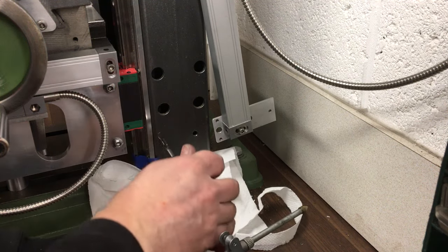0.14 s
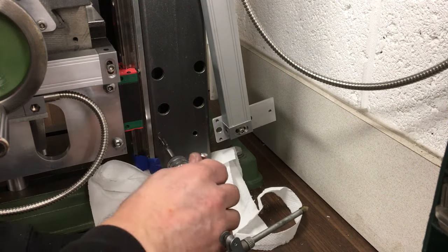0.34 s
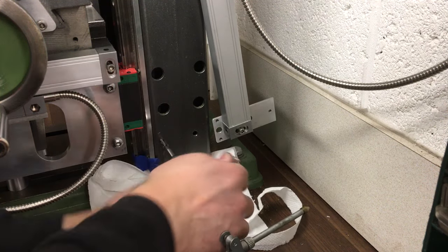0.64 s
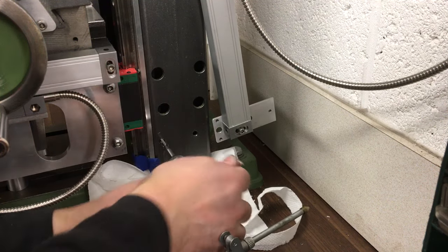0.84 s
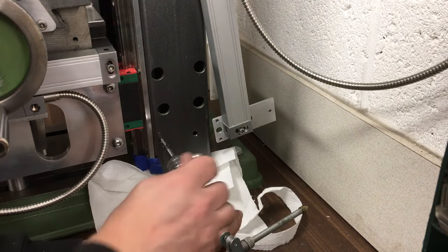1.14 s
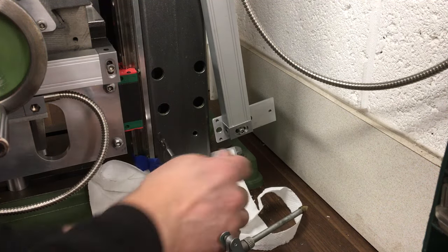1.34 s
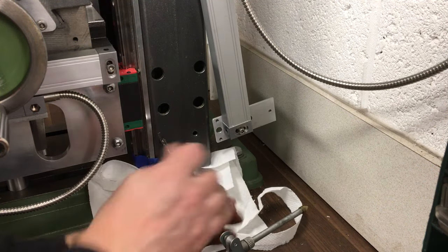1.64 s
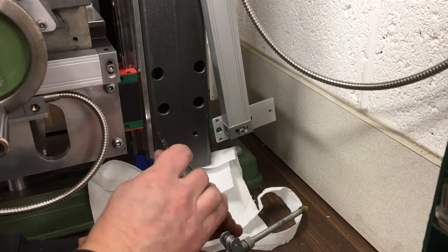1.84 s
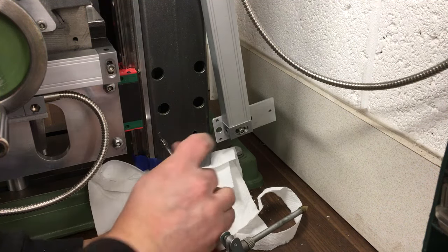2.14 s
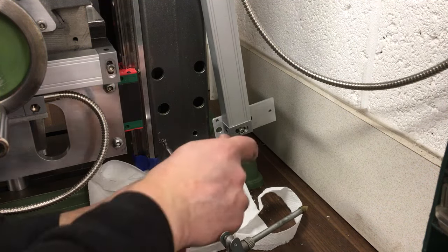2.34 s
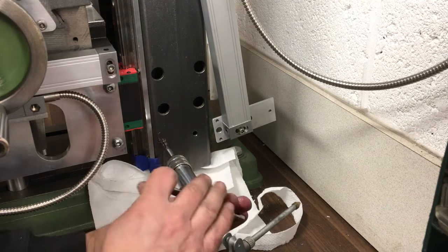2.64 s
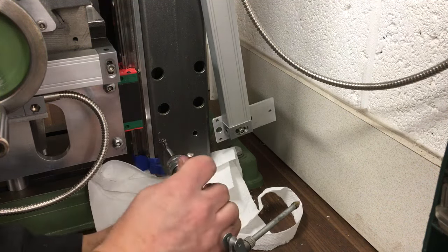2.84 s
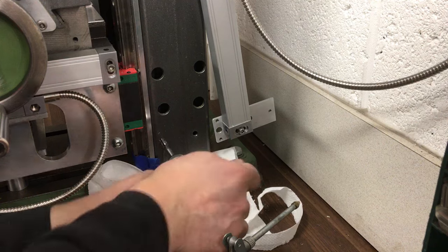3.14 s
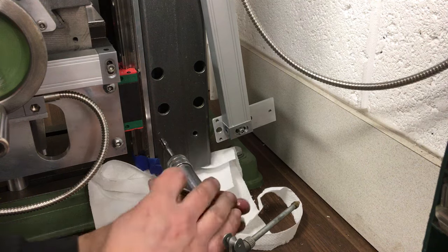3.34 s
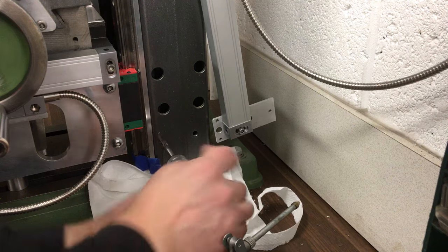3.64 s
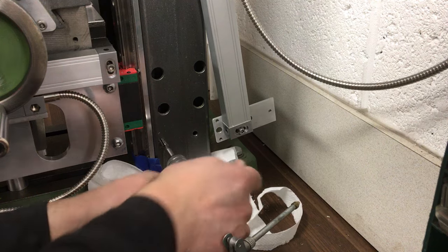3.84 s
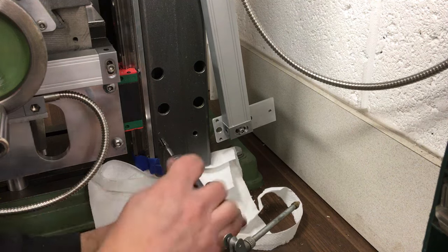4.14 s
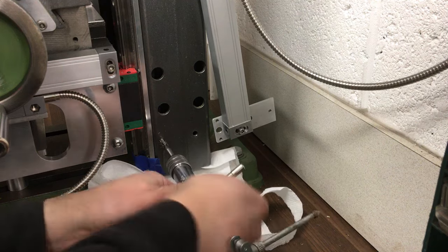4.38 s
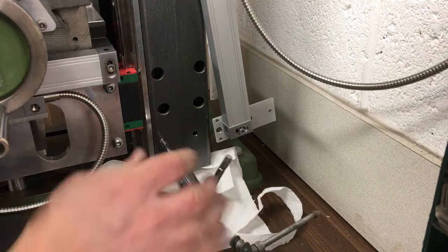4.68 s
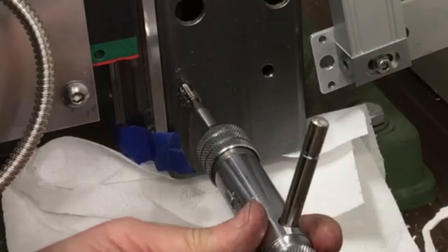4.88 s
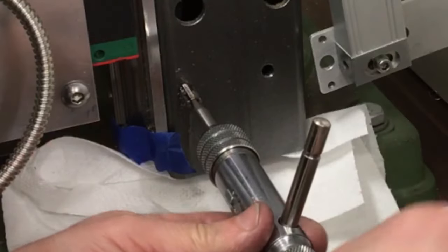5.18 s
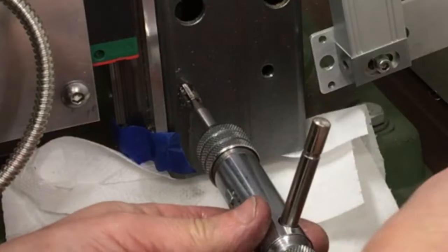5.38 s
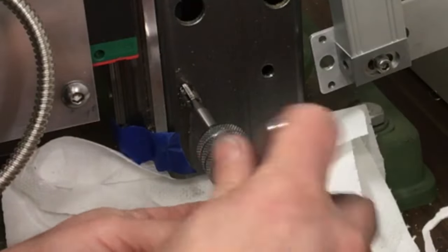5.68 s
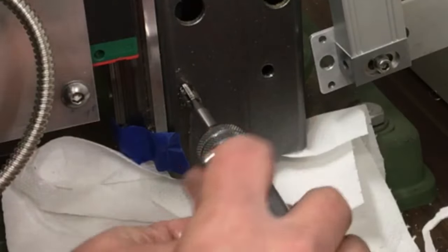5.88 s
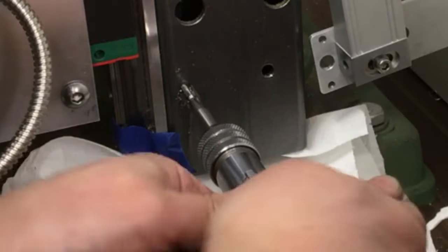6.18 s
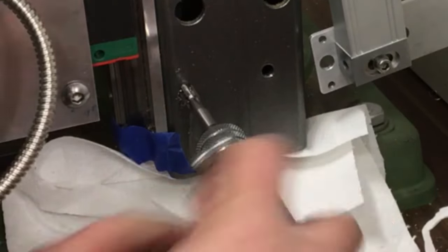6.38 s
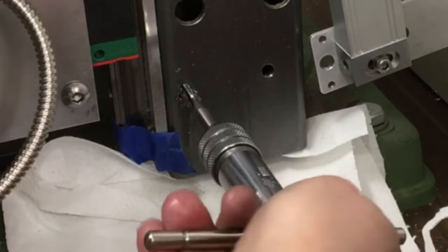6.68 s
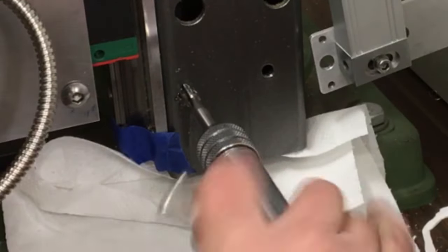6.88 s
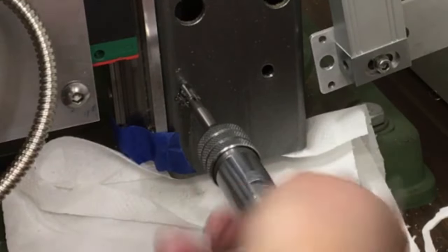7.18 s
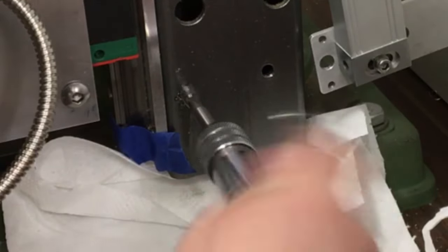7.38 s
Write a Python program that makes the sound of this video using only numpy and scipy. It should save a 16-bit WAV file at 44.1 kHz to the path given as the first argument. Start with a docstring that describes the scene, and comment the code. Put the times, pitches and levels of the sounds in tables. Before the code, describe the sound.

A ratcheting tap wrench clicks in short bright runs as hands rub and knock its steel handle, with dull frame bumps over faint workshop rumble.

```python
"""Low room rumble and faint air are heard first and run throughout; over them a hand bumps and scuffs
a machine's frame, which booms. Close by, a ratcheting tap wrench is worked by hand, all interleaved: fingers
rub and knock the handle, steel contacts tick, and the pawl ticks over a tooth and snaps into the next.
Blows are decaying sine modes plus bursts of coloured noise; rubbing is a stream of tiny random slips that
keeps such sounds going. A short room tail follows."""
import sys
import numpy as np
from scipy import signal
from scipy.fft import rfft, irfft, next_fast_len
from scipy.io import wavfile
from scipy.ndimage import map_coordinates

SR = 44100
rng = np.random.default_rng(int(sys.argv[2]) if len(sys.argv) > 2 else 0)


def dump(signal):
    """Clip the signal to [-1, 1] and save it as 16-bit WAV at the path in sys.argv[1]."""
    limited = np.clip(np.atleast_2d(signal).T, -1, 1)
    pcm = np.round(limited * 32767).astype(np.int16)
    wavfile.write(sys.argv[1], SR, pcm)


N = 331632  # length of the scene in samples


def amp(db):
    """Turn decibels into gain."""
    return 10 ** (np.asarray(db) / 20)


def unit(x):
    """Scale a sound to an rms level of 1."""
    return x / np.sqrt(np.mean(x ** 2) + 1e-20)


def along(points, hz):
    """Read a curve of (Hz, value) points on a log frequency axis."""
    point_hz, value = np.transpose(points)
    return np.interp(np.log(hz + 1), np.log(point_hz + 1), value)


def curves(rows):
    """Draw straight lines between the rows: one value per sample for each column after the time."""
    s, *columns = np.transpose(rows)
    return [np.interp(np.arange(N) / SR, s, column) for column in columns]


def wobble(rate):
    """A smooth random curve with `rate` random points a second."""
    knots = rng.standard_normal(int(N * rate / SR) + 4)
    return map_coordinates(knots, [np.arange(N) * rate / SR])


def filtered(x, gain):
    """Multiply the spectrum of x by a gain that depends on frequency."""
    size = next_fast_len(len(x) + 2048)
    spectrum = rfft(x, size) * gain(np.fft.rfftfreq(size, 1 / SR))
    return irfft(spectrum, size)[:len(x)]


def noise(spectrum, size):
    """Random hiss coloured by a spectrum, with an rms level of 1."""
    return unit(filtered(rng.standard_normal(size), lambda hz: amp(along(spectrum, hz))))


def add(track, s, sound):
    """Mix a sound into the track at time s in seconds."""
    part = track[round(s * SR):][:len(sound)]
    part += sound[:len(part)]


def burst(spectrum, t60, attack):
    """The dense vibration of a contact: coloured noise that falls 60 dB in t60 seconds."""
    t = np.arange(SR // 3) / SR
    onset = 1 - np.exp(-t / attack)
    return noise(spectrum, len(t)) * amp(-60 * t / t60) * onset


def ring(modes, colour, attack, swell_cycles, scatter_db, detune):
    """Decaying sine modes; the blow's colour sets their levels, low ones swell slower, and each blow varies."""
    t = np.arange(SR // 3) / SR
    hz, db, t60 = np.transpose(modes)[:, :, None]
    size, pitch, phase = rng.standard_normal((3, len(modes), 1))
    level = amp(db + along(colour, hz) + scatter_db * size - 60 * t / t60)
    waves = np.sin(2 * np.pi * (hz * (1 + detune * pitch) * t + phase))
    onset = 1 - np.exp(-t / (attack + swell_cycles / hz))
    return np.sum(level * waves * onset, axis=0)


def slips(rate, spread_db):
    """Sparse random impulses of uneven size and either sign, on average `rate` a second."""
    happens = rng.random(N) < rate / SR
    return happens * rng.choice([-1, 1], N) * amp(spread_db * rng.standard_normal(N))


def strokes(rows, swell_db, fade_s):
    """Gain per sample: each stroke swells by swell_db to its crest, eases off again and lets go."""
    t, gain = np.arange(N) / SR, np.zeros(N)
    for crest, rise_s, fall_s, db in rows:
        start, end = crest - rise_s, crest + fall_s
        contact = np.clip(np.minimum(t - start, end - t) / fade_s + .5, 0, 1)
        below_crest_db = np.interp(t, [start, crest, end], [swell_db, 0, swell_db])
        gain = np.maximum(gain, contact * amp(db - below_crest_db))
    return gain


# Low rumble of the room and the moving arm. Each row: time in seconds, relative level in dB.
RUMBLE_LEVEL = [(0.0, -53), (0.23, -62.5), (1.23, -57.5), (1.53, -66), (4.55, -57), (4.79, -69.5),
                (7.46, -50.5), (7.52, -45)]
# Colour of the low rumble. Each row: frequency in Hz, strength in dB per Hz.
RUMBLE_COLOUR = [(12, -44), (20, -30.5), (39, -10), (54, 9), (81, -3.5), (108, 6.5), (124, 7), (146, -7.5),
                 (195, -27.5), (220, -7.5), (290, -30.5), (480, -120)]
# Colour of the still air. Each row: frequency in Hz, strength in dB per Hz.
AIR_COLOUR = [(60, -4.5), (110, -1.5), (180, -18), (260, -8), (500, -14.5), (800, -13.5), (1400, -20),
              (2300, -19), (3100, -26), (6000, -27), (10000, -28), (13000, -32.5), (16500, -41.5)]


def background():
    """Workshop air and low rumble: two coloured noises, the air wavering and the rumble following its level."""
    air = amp(-62.5 + wobble(1.5)) * noise(AIR_COLOUR, N)
    rumble_db = curves(RUMBLE_LEVEL)[0] + 3.0
    return air + amp(rumble_db) * noise(RUMBLE_COLOUR, N)


# Ringing modes of the machine frame. Each row: pitch in Hz, relative level in dB, time to fall 60 dB in seconds.
FRAME_MODES = [(112, -5, .15), (140, -5, .14), (172, 0, .19), (190, -5, .14), (245, -7, .1), (291, -7, .15),
               (345, -8, .07), (404, 1, .14), (473, -2, .12), (545, -11, .07), (684, -16, .07),
               (960, -4, .07), (1080, -9, .06), (1620, -14, .06)]


def boom():
    """A soft push mostly reaches the frame's lowest modes."""
    soft = [(110, -13), (172, -5.5), (250, -14), (450, -30), (900, -51.5)]
    return ring(FRAME_MODES, soft, attack=0.0059, swell_cycles=.7, scatter_db=-1.5, detune=0.013)


# The hand bumps the frame and settles against it. Each row: time in seconds, relative boom level in dB,
# hardness in dB, gap between rebounds in seconds, loss per rebound in dB.
FRAME_BUMPS = [(0.642, -33.5, -27.5, .05, 5), (0.824, -18, -13, 0.052, 8), (1.229, -16, -21.5, .032, 6.5),
               (1.345, -36, -6, 0.031, 8), (2.785, -19.5, -11.5, .02, 18), (2.818, -20.5, -14.5, 0.069, 8),
               (3.556, -17.5, -23, .05, 4), (3.604, -18.5, -11, 0.049, 4), (4.292, -17.5, -12, 0.046, 3.5),
               (4.502, -16.5, -15, .024, 0.5), (4.526, -15, -18.5, 0.047, 8.5),
               (5.066, -18.5, -20.5, 0.062, 10), (5.482, -12.5, -2, 0.0189, 10),
               (5.657, -23, -18.5, 0.047, 0.5), (5.704, -22, -10.5, 0.047, 1.5),
               (6.136, -33.5, -8.5, .03, 6), (6.697, -32.5, -1, 0.026, 9), (7.243, -31.5, -7.5, 0.026, 8)]
# The hand scuffs along the frame. Each row: time of the crest in seconds, rise in seconds, fall in seconds,
# relative level in dB.
FRAME_SCUFFS = [(2.81, 0.037, 0.022, -34), (4.515, 0.015, .04, -30), (5.153, .04, 0.032, -30),
                (5.218, 0.038, 0.023, -32.5), (5.51, .008, .11, -26.5)]
# Colour of the thud of a bump. Each row: frequency in Hz, strength in dB per Hz.
THUD_COLOUR = [(50, -29.5), (110, 4.5), (230, 4), (320, 7), (440, 2.5), (620, 3), (800, -9), (1050, -3.5),
               (1500, -15), (2600, -20.5), (6000, -34), (12000, -41.5)]
CLACK_TILT = 1.7  # hardness counts this much more for the modes near 1 kHz
LEAN_DB = -65.5  # middle level of the frame's faint hum under the working hand, before the high-pass


def frame():
    """Bumps make the frame boom, twice more as the hand settles; harder ones and scuffs reach higher modes."""
    out = np.zeros(N)
    for s, boom_db, hard_db, gap_s, loss_db in FRAME_BUMPS:
        clunk_db = boom_db + hard_db
        clack_db = boom_db + CLACK_TILT * hard_db
        colour = [(110, boom_db - 10), (180, boom_db - 8), (290, clunk_db - 1.5), (400, clunk_db - 8.5),
                  (480, clunk_db - 1.0), (680, clunk_db - 10), (900, clack_db - 0.5)]
        add(out, s, ring(FRAME_MODES, colour, attack=.002, swell_cycles=.7, scatter_db=1.2, detune=.008))
        add(out, s, amp(clunk_db - 6) * burst(THUD_COLOUR, t60=0.13, attack=0.0065))
        add(out, s, amp(clack_db + 6) * burst(THUD_COLOUR, t60=0.043, attack=0.0036))  # the blow itself
        for rebound in (1, 2):
            add(out, s + rebound * gap_s, amp(boom_db - rebound * loss_db) * boom())
    # stick-slip under the hand keeps shaking the same modes
    colour = [(170, 9.8), (290, 10.4), (400, 1.2), (480, 3), (1000, 4)]
    body = ring(FRAME_MODES, colour, attack=.0003, swell_cycles=.2, scatter_db=1, detune=.004)
    contact = body + amp(9) * burst(THUD_COLOUR, t60=0.025, attack=0.000096)
    judder = unit(signal.fftconvolve(slips(rate=1500, spread_db=5), contact)[:N])
    speck = burst(CLATTER_COLOUR, t60=0.01, attack=0.00016)
    grit = unit(signal.fftconvolve(slips(rate=400, spread_db=4), speck)[:N])
    scuff_gain = strokes(FRAME_SCUFFS, swell_db=10.5, fade_s=0.023) * amp(1.8 * wobble(70))
    out += scuff_gain * (amp(0.5) * judder + amp(-21.5) * grit)
    hum = unit(signal.fftconvolve(slips(rate=150, spread_db=5), boom())[:N])
    out += amp(LEAN_DB + 0.5 * wobble(1.7)) * hum
    lowest_hz = 90  # the frame hardly radiates below this
    return signal.sosfilt(signal.butter(3, lowest_hz, "high", fs=SR, output="sos"), out)


# Ringing modes of the handle and tap. Each row: pitch in Hz, relative level in dB,
# time to fall 60 dB in seconds.
HANDLE_MODES = [(860, -2, 0.06), (1101, -2.5, 0.032), (1637, -1, 0.032), (1990, -17, 0.11),
                (2270, -11, 0.058), (2439, 0.5, 0.03), (2550, -17.5, 0.13), (3013, -14, 0.085),
                (3300, -8.5, 0.057), (3487, -6.5, 0.015), (3933, -13.5, 0.058), (4514, -1.5, 0.015),
                (5240, -12.5, 0.049)]
# Colour of the cloud of weaker modes. Each row: frequency in Hz, strength in dB per Hz.
CLATTER_COLOUR = [(300, -7), (600, -1.5), (900, 3.5), (1350, 0), (2300, -0.5), (2800, -3), (3300, -15),
                  (4100, -5.5), (5500, -13.5), (8000, -22)]


def handle(low_db, high_db, attack):
    """The wrench body answers a contact: clear modes in a cloud of weaker ones."""
    modes = ring(HANDLE_MODES, [(1500, low_db), (2600, high_db)], attack=attack, swell_cycles=4.2,
                 scatter_db=3.7, detune=0.015)
    cloud_db = (low_db + high_db) / 2 - 5.0
    return modes + amp(cloud_db) * burst(CLATTER_COLOUR, t60=0.061, attack=attack)


# Skin and sleeve slide over the tool. Each row: time of the crest in seconds, rise in seconds,
# fall in seconds, relative level in dB.
RUB_STROKES = [(.75, 0.076, .2, -67), (1.52, 0.037, 0.058, -63), (2.33, 0.016, .12, -57.5),
               (2.8, 0.033, 0.034, -55), (3.2, .11, 0.062, -58), (3.85, 0.091, 0.091, -56.5),
               (4.445, 0.054, 0.067, -48.5), (6.21, 0.19, 0.12, -52), (6.46, 0.11, 0.18, -53.5),
               (6.78, 0.081, 0.072, -50.5), (7.19, 0.16, 0.14, -51), (7.5, 0.13, 0.063, -50)]
# Colour of the skin's rub. Each row: frequency in Hz, strength in dB per Hz.
SKIN_COLOUR = [(100, -26), (300, -3.5), (600, -7.5), (860, -8), (1700, -9), (2400, -17), (3000, -13.5),
               (4500, -38.5), (8000, -58)]
# Colour of the sleeve's hiss. Each row: frequency in Hz, strength in dB per Hz.
SLEEVE_COLOUR = [(2000, -15), (4500, 2), (7000, -8), (9000, 2), (12000, -15), (16000, -23)]
# Colour of the grains of the knurling. Each row: frequency in Hz, strength in dB per Hz.
KNURL_COLOUR = [(1200, -18), (2500, 3.5), (4500, -5), (8000, 8), (12000, 10), (16000, -7)]
# the ratchet drags before and after each tooth: seconds before, seconds after, relative level in dB
DRAG_LEAD_S, DRAG_TAIL_S, DRAG_DB = .1, 0.067, -58.5


def rubbing():
    """Skin catches on knurled steel and sets it faintly ringing; the sleeve hisses along; the ratchet drags."""
    pressure = strokes(RUB_STROKES, swell_db=9.5, fade_s=0.023)
    drag_rows = [(s, DRAG_LEAD_S, DRAG_TAIL_S, DRAG_DB) for s, *_ in RATCHET_TEETH]
    drag = strokes(drag_rows, swell_db=9, fade_s=0.023)
    steel = np.zeros(N)
    # each of four fingers gets its own handle ring and its own wandering pressure
    for finger in range(4):
        catches = slips(rate=28, spread_db=4) * amp(3.5 * wobble(10))
        steel += signal.fftconvolve(catches, handle(-2.5, -0.88, attack=0.0006))[:N]
    skin = noise(SKIN_COLOUR, N) * amp(3.5 * wobble(60))
    sleeve = noise(SLEEVE_COLOUR, N) * amp(3 * wobble(90))
    scrape = unit(steel) + amp(-4) * skin
    grain = burst(KNURL_COLOUR, t60=0.017, attack=.0002)
    knurl = unit(signal.fftconvolve(slips(rate=48, spread_db=5), grain)[:N])
    return (pressure + drag) * scrape + pressure * (amp(-6.5) * sleeve + amp(-7.5) * knurl)


# The loose handle knocks in the fingers. Each row: time in seconds, relative low ring level in dB,
# relative upper ring level in dB.
HANDLE_KNOCKS = [(1.003, -24.5, -53), (1.168, -24.5, -42.5), (1.339, -27, -39.5), (1.704, -25, -50),
                 (1.94, -23.5, -51), (2.285, -31, -27), (2.596, -29.5, -60), (2.96, -28, -49.5),
                 (3.818, -49, -43.5), (4.501, -10.5, -45), (5.945, -20.5, -50), (6.125, -14.5, -39),
                 (6.263, -35.5, -36.5), (6.647, -15, -47), (6.69, -16, -29.5), (6.812, -20, -58),
                 (7.105, -15.5, -37), (7.463, -7, -26), (7.503, -25, -28)]
# The cross bar slides against its stop. Each row: time in seconds, relative level in dB.
BAR_CLINKS = [(4.503, -32.5), (5.029, -31), (7.501, -28.5)]
# Ringing modes of the cross bar. Each row: pitch in Hz, relative level in dB, time to fall 60 dB in seconds.
BAR_MODES = [(1610, -1, 0.029), (1675, 1, 0.04), (1740, -14, 0.067)]
# Colour of a steel contact. Each row: frequency in Hz, strength in dB per Hz.
TICK_COLOUR = [(1500, -25), (4000, -5), (6500, -5.5), (9000, 1.5), (11500, -1), (13500, 0.5), (15500, -13),
               (17000, -19.5)]
# Colour of a sharp crack. Each row: frequency in Hz, strength in dB per Hz.
CRACK_COLOUR = [(400, -32), (1000, -13), (3000, -3), (5800, -11.5), (9000, 0.5), (12000, -23),
                (13500, -4.5), (15500, -20.5), (17000, -22.5)]
RATTLE_DB = -5.5  # bright rattle, relative to a knock's upper ring level in the table


def grip():
    """Fingers catch the handle, which knocks and rebounds in its play; the cross bar clinks on its stop."""
    out = np.zeros(N)
    for s, low_db, high_db in HANDLE_KNOCKS:
        delay = 0.012 * np.exp(0.22 * rng.standard_normal())  # about 12 ms to the first rebound
        for when, db in [(s, 0), (s + delay, -7), (s + 1.5 * delay, -13)]:
            add(out, when, amp(db) * handle(low_db - 15.5, high_db - 1.5, attack=0.00092))
            add(out, when, amp(db + high_db + RATTLE_DB) * burst(TICK_COLOUR, t60=0.033, attack=0.0015))
    for s, db in BAR_CLINKS:
        bar = ring(BAR_MODES, [(1670, 0.0062)], attack=0.0037, swell_cycles=2.4, scatter_db=1, detune=.002)
        add(out, s, amp(db + 6.0) * bar)
        add(out, s, amp(db - 12.5) * burst(CLATTER_COLOUR, t60=0.054, attack=0.00062))
        add(out, s, amp(db - 9) * burst(CRACK_COLOUR, t60=0.016, attack=0.00026))
    return out


def steel_contact(contact_db, handle_db):
    """Steel meets steel: a short bright burst, which also stirs the handle."""
    steel = amp(contact_db - 11.5) * burst(TICK_COLOUR, t60=0.027, attack=0.00018)
    return steel + amp(-4.0) * handle(handle_db - 5, handle_db, attack=0.00035)


# Steel contacts around the wrench: mostly light ticks, with one hard knock near 7.13 s.
# Each row: time in seconds, relative contact level in dB, relative handle ring level in dB.
STEEL_CONTACTS = [(1.029, -39, -36), (1.2224, -27.5, -51), (2.286, -19, -34), (2.375, -35, -44),
                  (2.7951, -26, -49), (3.1745, -24, -30), (3.2328, -33.5, -33.5), (3.3162, -37, -41),
                  (3.3654, -38, -48), (4.0035, -43, -51), (4.465, -25, -30), (4.502, -32, -39),
                  (5.074, -32, -46), (5.9419, -22.5, -60), (6.358, -35.5, -42), (6.43, -35, -36),
                  (6.5836, -23, -46), (6.945, -30.5, -45), (7.1346, -10, -17.5), (7.323, -39.5, -49)]
# The pawl climbs a tooth and drops into the next. Each row: time of the snap in seconds, climb in seconds,
# then relative levels in dB of the pawl's ring, the jolt to the handle and the chuck's ring.
RATCHET_TEETH = [(1.1175, .030, -19, -41, -26), (1.798, 0.02, -18.5, -39, -33.5),
                 (1.891, 0.044, -19, -44, -33.5), (2.716, .029, -19, -42.5, -31.5),
                 (3.4253, 0.015, -16.5, -38, -29.5), (3.4911, 0.025, -12.5, -38, -40),
                 (4.104, .018, -19, -41, -23), (4.1697, 0.023, -13.5, -43, -30),
                 (5.8646, .012, -12.5, -40, -27), (6.514, 0.0066, -17.5, -37.5, -32),
                 (6.5485, 0.011, -19.5, -40, -34), (6.9844, 0.0095, -16, -40.5, -36),
                 (7.017, .010, -19.5, -40, -27.5), (7.0487, 0.01, -15, -39.5, -28.5),
                 (7.3746, 0.011, -16.5, -35, -34.5), (7.4071, 0.0096, -15.5, -38, -32),
                 (7.4322, 0.0084, -19.5, -40, -33), (7.4617, 0.014, -18.5, -31.5, -47)]
# Ringing modes of the pawl and ratchet wheel. Each row: pitch in Hz, relative level in dB,
# time to fall 60 dB in seconds.
PAWL_MODES = [(9220, -13.5, 0.024), (10800, -11.5, 0.013), (11700, -4.5, 0.02), (11400, 9, 0.026),
              (11000, -14, 0.025), (13070, -9, 0.019), (12570, -10.5, 0.012)]
# Colour of the pawl's buzz. Each row: frequency in Hz, strength in dB per Hz.
BUZZ_COLOUR = [(8000, -27.5), (10300, -8), (11300, 1), (11900, -1), (12600, -6), (14000, -31.5)]
# Colour of the chuck's ring. Each row: frequency in Hz, strength in dB per Hz.
CHUCK_COLOUR = [(2000, -39.5), (2850, -20.5), (3120, -6), (3350, 2), (3560, -0.5), (3850, -23),
                (5500, -22.5)]
CLIMB_TICK_DB, CLIMB_HANDLE_DB = -23.5, -47  # relative levels as the pawl meets a tooth
CRACK_DB = 10  # the crack of the snap, relative to the jolt level in the table


def ratchet():
    """The sprung pawl ticks as it climbs a tooth, snaps down, rings near 11 kHz and jolts chuck and handle."""
    out = np.zeros(N)
    for s, climb_s, pawl_db, jolt_db, chuck_db in RATCHET_TEETH:
        add(out, s - climb_s, steel_contact(CLIMB_TICK_DB, CLIMB_HANDLE_DB))
        pawl = ring(PAWL_MODES, [(11000, 0.0086)], attack=0.00039, swell_cycles=0.88,
                    scatter_db=5.0, detune=0.013)
        add(out, s, amp(pawl_db - 13.0) * pawl)
        add(out, s, amp(pawl_db - 3.5) * burst(BUZZ_COLOUR, t60=0.02, attack=0.0001))
        add(out, s, amp(jolt_db + CRACK_DB) * burst(CRACK_COLOUR, t60=0.032, attack=0.00011))
        add(out, s, amp(chuck_db + 4) * burst(CHUCK_COLOUR, t60=0.022, attack=0.0011))
        add(out, s, amp(6.0) * handle(jolt_db, jolt_db + 3.5, attack=0.0021))
    for s, contact_db, handle_db in STEEL_CONTACTS:
        add(out, s, steel_contact(contact_db, handle_db))
    return out


# How long the room rings on. Each row: frequency in Hz, time to fall 60 dB in seconds.
ROOM_DECAY = [(150, 0.42), (1000, 0.43), (4000, 0.25), (11000, 0.21), (16000, 0.34)]


def room(x, tail_db):
    """Short diffuse echoes as decaying noise: a fresh random tail for each quarter second of sound."""
    out = np.zeros(N)
    size = SR // 4
    for start in range(0, N, size):
        hz, t, grains = signal.stft(rng.standard_normal(SR // 2), SR, nperseg=256)
        decay = amp(-60 * t / along(ROOM_DECAY, hz)[:, None])
        tail = signal.istft(grains * decay, SR, nperseg=256)[1]
        tail *= 1 - np.exp(-np.arange(len(tail)) / SR / 0.0007)  # soft onset
        tail /= np.linalg.norm(tail)
        add(out, start / SR, amp(tail_db) * signal.fftconvolve(x[start:start + size], tail))
    return out


def scene():
    """Wrench, hand and frame with their room tail, over the background."""
    near = ratchet() + grip() + frame() + rubbing()
    return (near + room(near, tail_db=-14) + background())[None]


TOP_HZ = 16100  # upper band limit


def record(dry):
    """A very steep low-pass removes the treble above the band limit."""
    return np.array([filtered(x, lambda hz: 1 / np.sqrt(1 + (hz / TOP_HZ) ** 160)) for x in dry])


dry = scene()
out = record(dry)
dump(out)
```